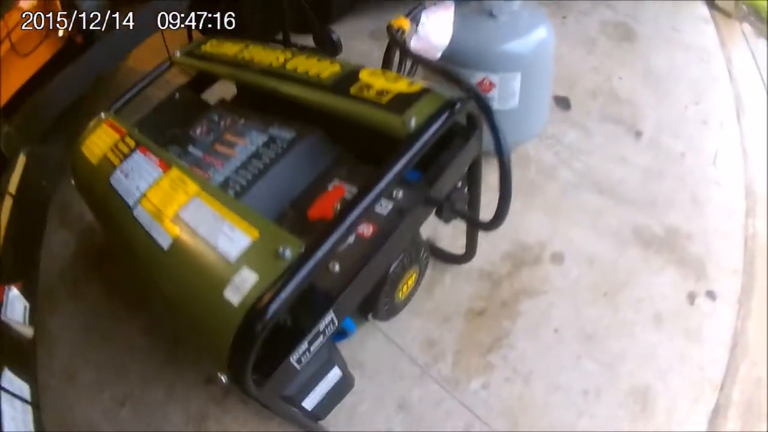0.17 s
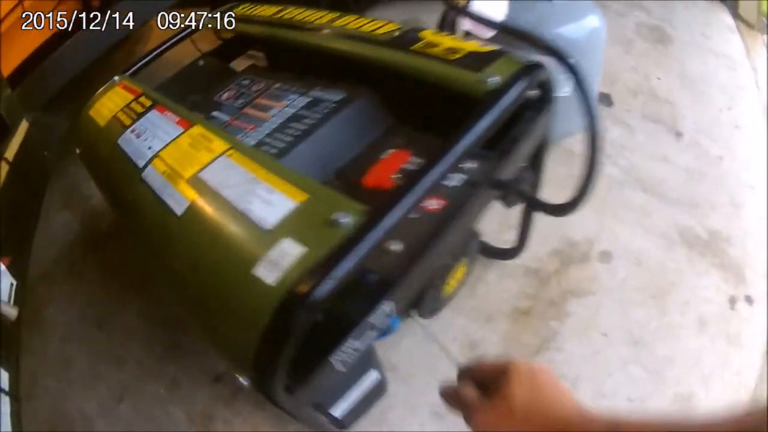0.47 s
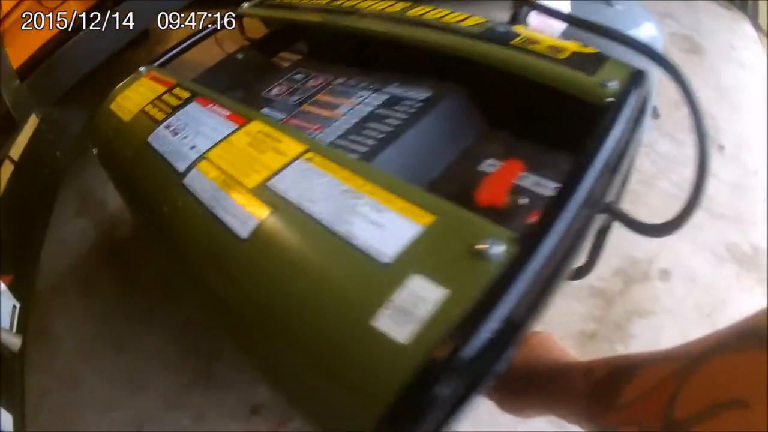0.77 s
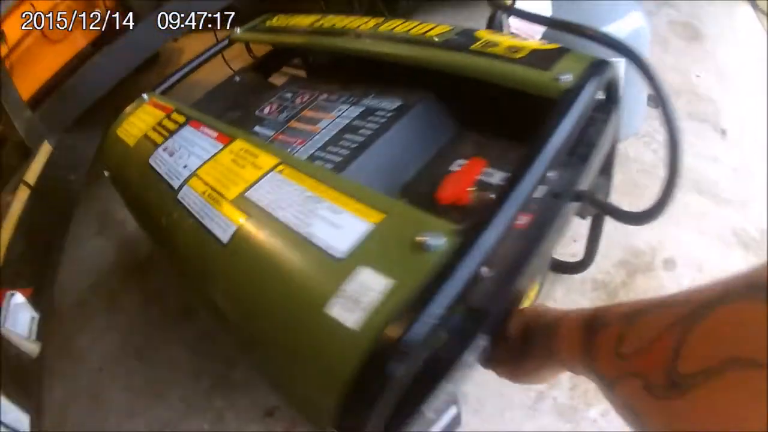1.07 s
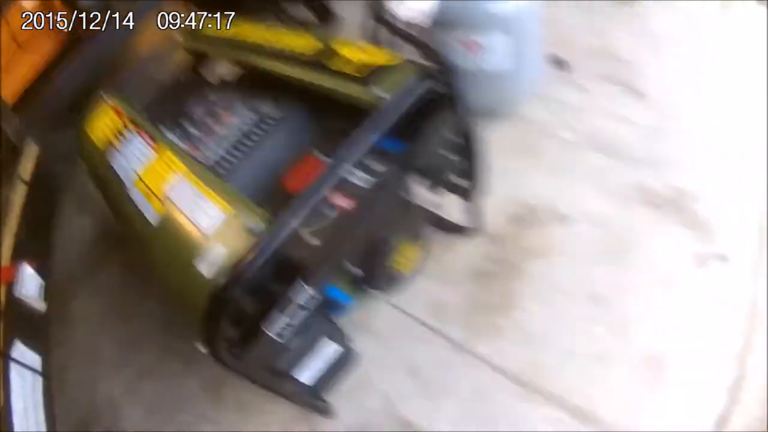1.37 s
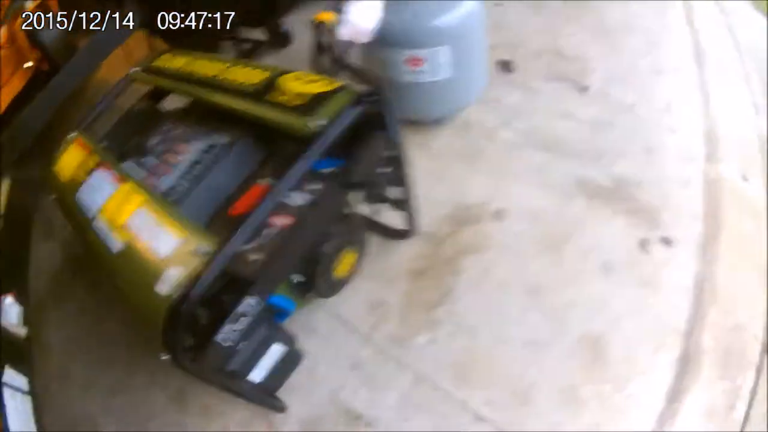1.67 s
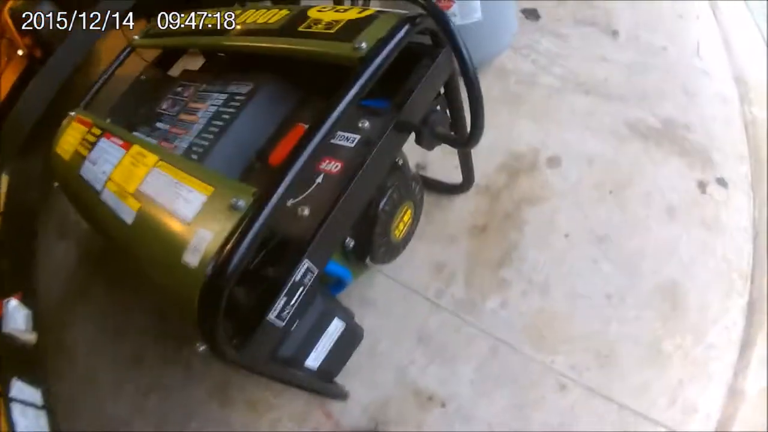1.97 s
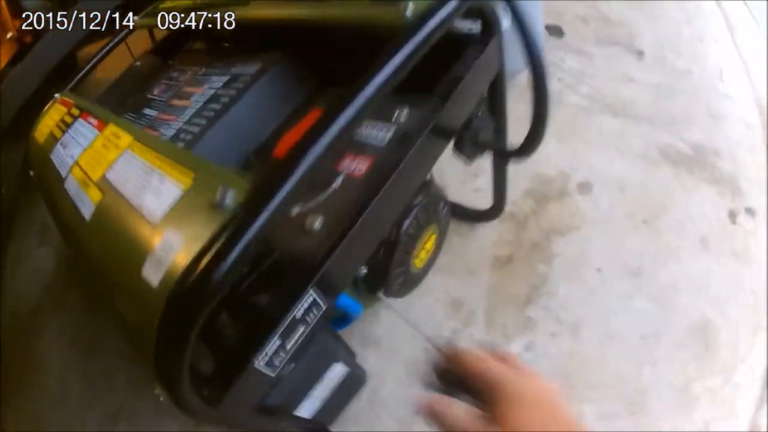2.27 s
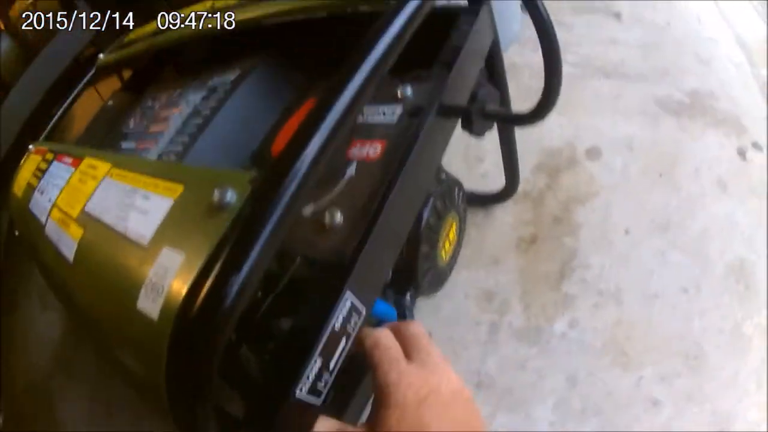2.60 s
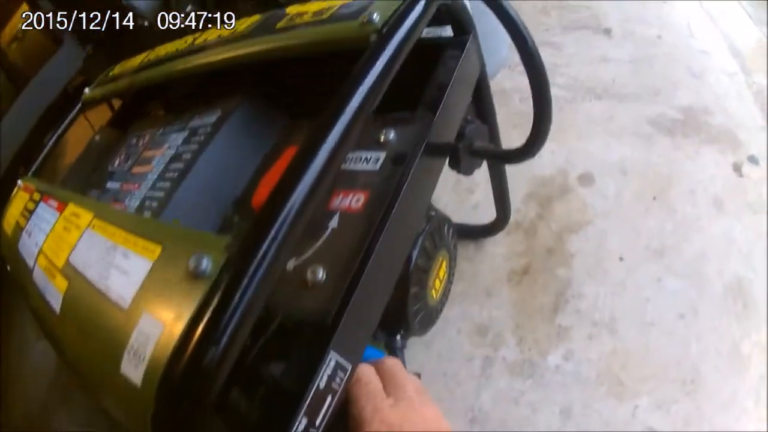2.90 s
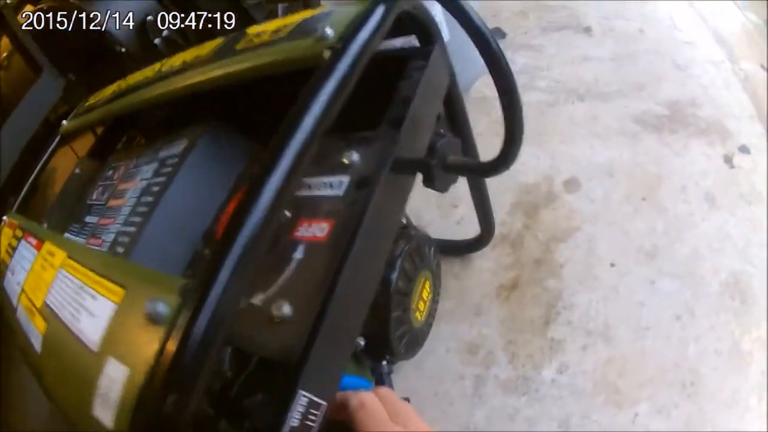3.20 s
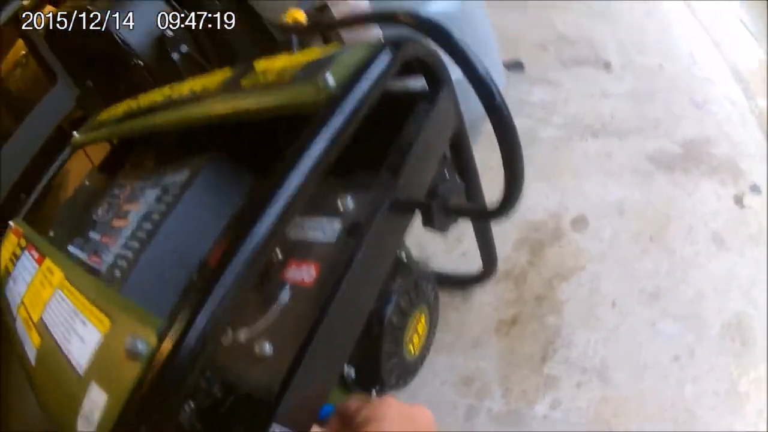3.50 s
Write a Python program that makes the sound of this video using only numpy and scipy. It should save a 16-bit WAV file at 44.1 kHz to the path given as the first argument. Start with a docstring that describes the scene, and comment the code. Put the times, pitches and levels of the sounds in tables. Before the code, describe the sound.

Generator pull-start: cord scrape, ratchet clanks and rising whine, then the engine fires up and rattles steadily.

```python
"""A small single-cylinder generator clatters on a concrete slab, heard from a body-worn camera a metre away.
The starter cord winds back, the camera is bumped, and the cord is yanked: pawls clank, the pulley whines up.
The engine turns over, catches and settles near 30 firings a second. Clatter is random ticks shaking panels;
the exhaust is a sum of overtones with puffs of noise; clanks are bursts of noise ringing the steel.
Cord noise, bumps, a short slab echo, outdoor air and a low rumble complete the scene."""
import sys
import numpy as np
from scipy import signal
from scipy.fft import rfft, irfft, next_fast_len
from scipy.io import wavfile
from scipy.ndimage import uniform_filter1d

SR = 44100
rng = np.random.default_rng(int(sys.argv[2]) if len(sys.argv) > 2 else 0)


def ratio_of_db(decibels):
    """Turn decibels (scalar or array-like) into linear amplitude factors; 0 dB maps to 1."""
    return 10 ** (np.asarray(decibels, float) / 20)


def file_out(sig):
    """Save sig as 16-bit WAV at sys.argv[1]."""
    # one column per channel
    cols = np.atleast_2d(sig).T
    # limit, then scale
    lim = np.clip(cols, -1, 1)
    pcm = np.round(lim * 32767).astype(np.int16)
    wavfile.write(sys.argv[1], SR, pcm)


N = 160965

# Engine speed [t/s, speed/cycles per s]; the first speed also holds before the first time
SPEED = [(1.45, 13.1), (1.7, 14), (1.9, 14.3), (1.94, 15), (2.0, 16.6), (2.09, 20), (2.15, 22.1),
         (2.23, 25), (2.3, 27.2), (2.37, 28.4), (2.456, 29.9), (2.55, 31), (2.66, 31.4), (2.8, 31.2),
         (2.95, 30.6), (3.12, 30.15), (3.4, 30.2), (3.65, 30.4)]
A_FIRING_S = 2.203  # a moment at which a cycle starts

# Casing clatter [t/s, level/dB, treble lift and equal bass cut/dB]
CLATTER = [(.88, -60, 5.5), (.94, -44, 1.5), (1.02, -25, 9), (1.07, -40, -7.5), (1.16, -35, -9),
           (1.3, -28.5, -7.5), (1.4, -24, 1), (1.53, -27, 2.5), (1.7, -24.5, -2), (1.9, -21, .5),
           (1.97, -16.5, -2.5), (2.1, -12.5, -2.5), (2.25, -12.5, -0.5), (2.45, -11, 1.5), (2.7, -10.5, 1),
           (2.9, -12, 0.5), (3.05, -11.5, 0), (3.3, -11, 2), (3.65, -11.5, -2)]
# Overall tone of the shaken casing [f/Hz, relative level/dB]
CASING = [(150, -51), (250, -17.5), (400, -23), (700, -12.5), (1250, -6.5), (1610, -8), (2910, -14.5),
          (3600, -25), (4750, -27), (5400, -26), (8000, -33.5), (16000, -39.5)]
# Resonances of the casing panels [f/Hz, width/Hz, relative level/dB]
PANELS = [(673, 20, -17), (844, 8.3, 2), (976, 49, -7), (1086, 26, 4), (1192, 84, -2), (1264, 23.4, 10),
          (1371, 53, 2), (1500, 23.3, 5.5), (1766, 37, -8), (2103, 29, 2), (2509, 48, -13.5),
          (2673, 20, -5), (2894, 122, -16)]
PANEL_DB = 1.5  # all panels together, against the casing tone
CYCLE_DEPTH, CYCLE_DECAY = 0.35, 0.74  # swell of the ticks in each cycle, and its decay in cycles
TICKS_PER_S, TICK_SPREAD_DB = 5000, 0.5
SLOW_DEPTH, SLOW_SHARE = 4.6, 0.32  # extra swell and share of ticks left when the shaft turns slowly

# Exhaust strength [t/s, level/dB]
ENGINE = [(1.45, -57.5), (1.7, -50), (1.9, -45.5), (1.94, -38), (2.09, -32.5), (2.23, -26), (2.37, -24),
          (2.55, -26), (2.7, -26.5), (3.1, -28), (3.65, -28.5)]
# Exhaust overtones [multiple of the cycle rate, relative level/dB]
EXHAUST = [(1, -25), (2, -5), (3, -12), (4, -6), (5, -2), (6, 0), (7, 0), (8, -4), (9, 0), (10, -9),
           (11, -9), (12, -2), (13, -10), (14, -9), (15, -5), (16, -6)]
EXHAUST_WAVER_DB, PUFF_DB = 1.3, -9
SECOND_PULSE_CYCLES, SECOND_PULSE = .35, .85  # delay and relative strength that set the overtone phases
MUFFLER_HZ, MUFFLER_WIDTH_HZ, MUFFLER_DB = 348, 23, -1

# Metal clanks [t/s, level/dB, rattle decay/s, brightness/dB per octave]
CLANKS = [(0.794, -37.5, 0.0034, -14), (0.9275, -34.5, 0.0041, 6.5), (0.9548, -24.5, 0.0045, 16.5),
          (0.9847, -18, 0.0055, 3), (0.998, -15.5, 0.0032, 6), (1.0036, -19, 0.0091, 17),
          (1.016, -12, 0.0091, -4), (1.024, -14.5, 0.006, 4.5), (1.0386, -20, 0.0031, 5),
          (1.1677, -22, 0.0026, -10), (1.2044, -22.5, 0.006, 2.5), (1.229, -18, 0.0033, -0.5),
          (1.2995, -22, 0.0042, 0), (1.3324, -29, 0.0054, -0.5), (1.3794, -18, 0.0048, 0),
          (1.4077, -9.5, 0.0078, 10), (1.4129, -7.5, 0.0021, 5.5), (1.4243, -15, 0.0026, 13.5),
          (1.437, -17, 0.005, 4), (1.4907, -18, 0.0036, -2), (1.552, -19, 0.0042, -1.5),
          (1.592, -24, 0.0076, -1), (1.6227, -17, 0.0046, 1), (1.7146, -17.5, 0.0055, -2),
          (1.745, -18, 0.0048, -7.5), (1.807, -8.5, 0.006, -5), (1.831, -16.5, 0.0065, 6.5),
          (1.921, -8.5, 0.0089, 5.5), (2.0163, -4.5, 0.0075, -7), (2.0376, -8, 0.012, 0),
          (2.0837, -0.5, 0.0066, -6.5), (2.1824, -5.5, 0.0083, -2)]
# Ringing modes of the struck steel [f/Hz, relative level/dB, time to fall 60 dB/s]
STEEL = [(648, -12, 0.11), (896, -6.5, 0.095), (1050, -8, 0.12), (1269, -4.5, 0.054), (1376, 4, .08),
         (1623, -16.5, 0.096), (1880, 1, .07), (2081, -3, 0.14), (2330, -5, .06), (2675, 2.5, 0.033),
         (2823, -4.5, 0.045), (3154, -15, 0.073), (3830, -19, .02)]
CRACK_DB, CRACK_AIR_DB = -3, -18  # whole crack, and the treble inside it

# Starter pulley whine [t/s, f/Hz, level/dB before the steel resonances]
WHINE = [(1.07, 560, -53), (1.105, 667.5, -26), (1.14, 893, -21.5), (1.165, 1270, -18), (1.185, 1420, -25),
         (1.21, 1650, -34), (1.245, 1850, -28), (1.285, 2040, -34), (1.36, 2090, -28.5),
         (1.42, 2090, -59.5)]
WHINE_WOBBLE_HZ, WHINE_BARE_DB = 70, -10

# The starter cup pings as the pawls let go [f/Hz, level/dB, time to fall 60 dB/s]
CUP = [(4775, -23, .45), (4720, -30, .3), (7170, -36, .2), (9050, -38, .12), (12500, -36, .1)]
PING_S = 1.412

# Cord winding back and scraping [t/s, level/dB]
CORD = [(0, -42), (.08, -42), (.14, -47.5), (.2, -41.5), (.26, -51.5), (.32, -54.5), (.39, -54), (.45, -58),
        (.55, -63), (.7, -61), (.79, -57.5), (.86, -60), (.9, -62)]
# Cord housing resonances [f/Hz, width/Hz, relative level/dB]
HOUSING = [(635, 49, 4), (890, 60, 5.5), (1110, 110, -2.5), (1335, 100, 4.5), (1597, 78, 7), (2090, 80, -4),
           (2640, 60, -4), (3090, 64, -9)]
HOUSING_HISS_DB = -12.5

# Bumps on the camera body [t/s, level/dB, length/s, top f/Hz]
BUMPS = [(.06, -42.5, 0.036, 150), (.47, -42, 0.021, 110), (.525, -38, 0.0092, 330), (.5, -44, 0.048, 204),
         (.57, -42, 0.023, 120), (.865, -42, 0.011, 330), (1.04, -44, 0.049, 337), (1.16, -34, 0.0037, 400),
         (0.97, -48, 0.0067, 330), (1.42, -48, 0.0094, 330), (1.947, -32.5, .015, 330),
         (2.19, -30.5, 0.052, 45)]

SLAB_T60_S, SLAB_DB = 0.13, -10  # echo: time to fall 60 dB, and level

# Tone of the outdoor air [f/Hz, relative level/dB]
YARD = [(20, 3), (50, 4.5), (100, -6), (180, -14), (300, -12), (450, -14.5), (700, -10.5), (1000, -5.5),
        (1370, 6), (1750, -20), (2200, -14.5), (2800, -9.5), (3300, -17.5), (4200, -31), (5400, -42.5),
        (16000, -61.5)]
YARD_DB, RUMBLE_DB = -53, -47.5  # the rumble level applies at 30 cycles per s

# Tone of the low-rate sound path: dull above 5.5 kHz, with the tone of faint
# sampling images and notches at 6 and 8 kHz [f/Hz, gain/dB]
LOW_RATE_TONE = [(20, -12.5), (3200, 3), (4700, -9), (5500, -27.5), (5900, -39), (6050, -58), (6200, -38.5),
                 (6600, -31), (7500, -27.5), (7850, -37.5), (8000, -58), (8200, -37.5), (8700, -26.5),
                 (10200, -25), (12500, -24.5), (15700, -31.5)]
CEILING = .9  # level that the rounded peaks cannot pass


def time():
    """Seconds of every sample."""
    return np.arange(N) / SR


def curve(table, col):
    """A table column joined by straight lines."""
    table = np.array(table, float)
    return np.interp(time(), table[:, 0], table[:, col])


def unit(x):
    """Scale to rms 1."""
    return x / np.sqrt(np.mean(x ** 2))


def fade(seconds, t60):
    """Steady dying away, down 60 dB after t60 seconds."""
    return np.exp(-np.log(1000) * seconds / t60)


def colour(x, points):
    """Weigh the spectrum by (Hz, dB) points."""
    points = np.array(points, float)
    size = next_fast_len(N + 4096)
    hz = np.maximum(np.arange(size // 2 + 1) * SR / size, 1)
    gain_db = np.interp(np.log(hz), np.log(points[:, 0]), points[:, 1])
    return irfft(rfft(x, size) * ratio_of_db(gain_db), size)[..., :N]


def band(x, hz, width):
    """Resonance with gain 1 at its centre, at least 5 Hz wide."""
    return signal.lfilter(*signal.iirpeak(hz, hz / max(width, 5), fs=SR), x)


def ring(x, peaks):
    """Sum of resonances with alternating signs."""
    return sum((-1) ** k * ratio_of_db(db) * band(x, hz, width) for k, (hz, width, db) in enumerate(peaks))


def walk(rate):
    """Smooth random wandering: random values held 1 / rate seconds, then smoothed twice."""
    hold = int(SR / rate)
    steps = np.repeat(rng.standard_normal(N // hold + 1), hold)
    return 1.3 * uniform_filter1d(uniform_filter1d(steps, hold), hold)[:N]


def grains(per_s, spread_db):
    """Random clicks of either sign and uneven size."""
    draw = rng.random((3, N))
    happens = draw[0] < per_s / SR
    size = ratio_of_db(np.minimum(-spread_db * np.log(1 - draw[2]), 16))
    return happens * np.sign(draw[1] - .5) * size


def tilt(x, lift_db):
    """Treble up and bass down about 1.6 kHz."""
    low = signal.sosfilt(signal.butter(1, 1600, fs=SR, output="sos"), x)
    return low * ratio_of_db(-lift_db) + (x - low) * ratio_of_db(lift_db)


def clatter(cycles, speed):
    """Dense metal ticks, swelling twice per cycle, shake the casing and its panels."""
    slow = np.clip(1.6 - speed / 19, 0, 1)  # 1 = slow shaft, 0 = fast
    first = np.exp(-(cycles % 1) / CYCLE_DECAY)
    second = 1.8 * np.exp(-((cycles + .5) % 1) / CYCLE_DECAY)
    swell = 1 + (CYCLE_DEPTH + SLOW_DEPTH * slow) * (first + second)
    share = 1 - slow * (1 - SLOW_SHARE)
    ticks = grains(TICKS_PER_S * share, TICK_SPREAD_DB) * swell
    # Even out the slow level changes, leaving the beat
    ticks = ticks / np.sqrt(share * uniform_filter1d(swell ** 2, SR // 8))
    body = unit(colour(ticks, CASING)) + ratio_of_db(PANEL_DB) * unit(ring(ticks, PANELS))
    on = np.clip((time() - CLATTER[0][0]) / 0.026, 0, 1)
    return tilt(unit(body), curve(CLATTER, 2)) * ratio_of_db(curve(CLATTER, 1)) * on


def exhaust(cycles):
    """Overtones phased as paired pulses, plus puffs of gas noise; the muffler rings at one pitch."""
    beat = 0
    for k, db in EXHAUST:
        pair_phase = np.angle(1 + SECOND_PULSE * np.exp(-2j * np.pi * k * SECOND_PULSE_CYCLES))
        level = ratio_of_db(db + EXHAUST_WAVER_DB * walk(12))
        beat = beat + level * np.cos(2 * np.pi * k * cycles + pair_phase + 0.33 * walk(10))
    puff = band(rng.standard_normal(N), 330, 270) * np.exp(-(cycles % 1) / .5)
    gas = unit(beat) + ratio_of_db(PUFF_DB) * unit(puff)
    gas = gas + ratio_of_db(MUFFLER_DB) * band(gas, MUFFLER_HZ, MUFFLER_WIDTH_HZ)
    on = np.clip((time() - ENGINE[0][0]) / .1, 0, 1)
    return gas * ratio_of_db(curve(ENGINE, 1)) * on


def clanks():
    """Each blow is a short rattle of noise: a bare crack plus the ring it sets off in the steel."""
    out = np.zeros(N + 2 * SR)
    span = np.arange(SR // 2) / SR
    short = span[:4000]
    for start, db, length, bright in CLANKS:
        envelope = np.exp(-short / max(length, .001)) * (1 - np.exp(-short / 0.0005))
        rattle = rng.standard_normal(4000) * envelope
        modes = 0
        # Each blow shifts the modes a little in level and pitch
        for hz, mode_db, t60 in STEEL:
            level = ratio_of_db(mode_db + 2.7 * rng.standard_normal() + bright * np.log2(hz / 1600))
            pitch = hz * (1 + 0.01 * rng.standard_normal())
            modes = modes + level * np.sin(2 * np.pi * pitch * span) * fade(span, t60)
        rung = signal.fftconvolve(rattle, modes)
        rung = rung / np.abs(rung).max()
        dull = band(band(rattle, 2400, 2600), 2400, 2600)
        air = ratio_of_db(CRACK_AIR_DB + bright) * np.diff(rattle, prepend=0)
        crack = np.pad(dull + air, (0, len(rung) - 4000)) * ratio_of_db(CRACK_DB)
        i = int(start * SR)
        out[i:i + len(rung)] += ratio_of_db(db) * (rung + crack)
    return out[:N]


def whine():
    """A rough tone that rises with the pull, heard mostly where it meets a resonance of the steel."""
    pitch = curve(WHINE, 1) + WHINE_WOBBLE_HZ * walk(200)
    tone = np.sqrt(2) * np.sin(2 * np.pi * np.cumsum(pitch) / SR)
    on = (time() > WHINE[0][0]) & (time() < WHINE[-1][0])
    tone = tone * ratio_of_db(curve(WHINE, 2) + 6.2 * walk(90)) * on
    # The faster a mode dies away, the wider its resonance
    peaks = [(hz, 4.0 / t60, 0) for hz, _, t60 in STEEL]
    return ratio_of_db(WHINE_BARE_DB) * tone + ring(tone, peaks)


def ping():
    """A few thin rings of the starter cup die away slowly with unsteady levels."""
    after = np.maximum(time() - PING_S, 0)
    out = 0
    for hz, db, t60 in CUP:
        out = out + ratio_of_db(db + 3.5 * walk(80)) * np.sin(2 * np.pi * hz * after) * fade(after, t60)
    return out


def cord():
    """The cord rubs and ticks inside its housing, as random clicks through resonances."""
    rub = grains(3000, 2.0) * ratio_of_db(2.0 * walk(30))
    hiss = ratio_of_db(HOUSING_HISS_DB) * unit(band(rub, 1600, 2400))
    body = unit(ring(rub, HOUSING)) + hiss
    on = np.clip((CORD[-1][0] - time()) / .02 + 1, 0, 1)
    return unit(body) * ratio_of_db(curve(CORD, 1)) * on


def bumps():
    """Dull thumps carried through the camera body: low noise that swells and fades."""
    out = 0
    for at, db, length, top_hz in BUMPS:
        low_pass = signal.butter(2, top_hz, fs=SR, output="sos")
        thud = signal.sosfilt(low_pass, rng.standard_normal(N))
        out = out + ratio_of_db(db) * unit(thud) * np.exp(-.5 * ((time() - at) / length) ** 2)
    return out


def slab_echo(machine):
    """Short reflections from slab and wall: a dense random tail that starts after 4 ms."""
    span = np.arange(SR // 3) / SR
    tail = rng.standard_normal(len(span)) * fade(span, SLAB_T60_S) * (span > .004)
    return ratio_of_db(SLAB_DB) * signal.fftconvolve(machine, tail / np.sqrt(np.sum(tail ** 2)))[:N]


def yard(speed):
    """Quiet outdoor air, and a rumble of the slab that grows with engine speed."""
    air = unit(colour(rng.standard_normal(N), YARD)) * ratio_of_db(YARD_DB + 2.1 * walk(6.2))
    rumble = unit(band(rng.standard_normal(N), 35, 50)) * ratio_of_db(RUMBLE_DB + 4.0 * walk(6))
    return air + rumble * (speed / 30) ** 2


def scene():
    """The machine with its slab echo, plus exhaust, camera bumps and background."""
    speed = curve(SPEED, 1)
    cycles = np.cumsum(speed) / SR
    cycles = cycles - cycles[int(A_FIRING_S * SR)]
    machine = clatter(cycles, speed) + clanks() + whine() + ping() + cord()
    mix = machine + slab_echo(machine) - exhaust(cycles) + bumps() + yard(speed)
    return mix[None]


def top_cut(x):
    """Nothing passes above the cut-off."""
    return signal.sosfilt(signal.butter(12, 15700, fs=SR, output="sos"), x)


def record(dry):
    """The loudest peaks are rounded, then the tone of a low-rate sound path dulls the treble."""
    rounded = CEILING * np.tanh(dry / CEILING)
    mix = colour(rounded, LOW_RATE_TONE)
    return top_cut(mix)


dry = scene()
out = record(dry)
file_out(out)
```